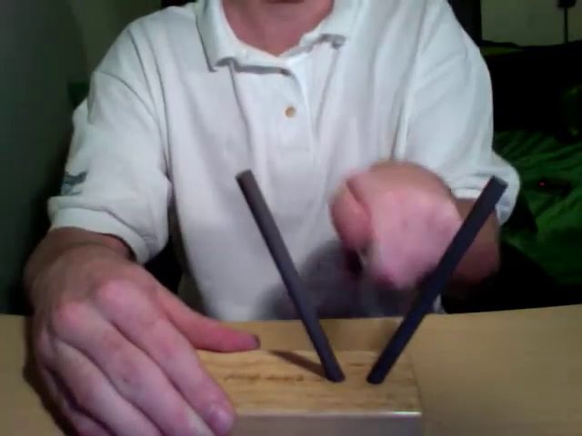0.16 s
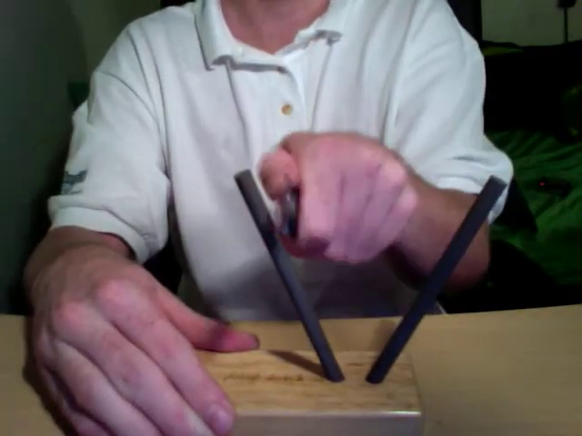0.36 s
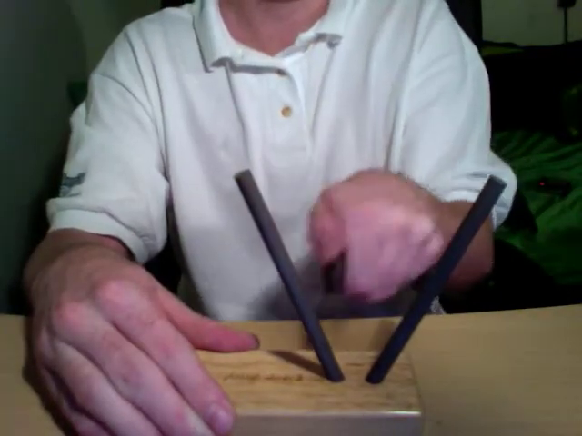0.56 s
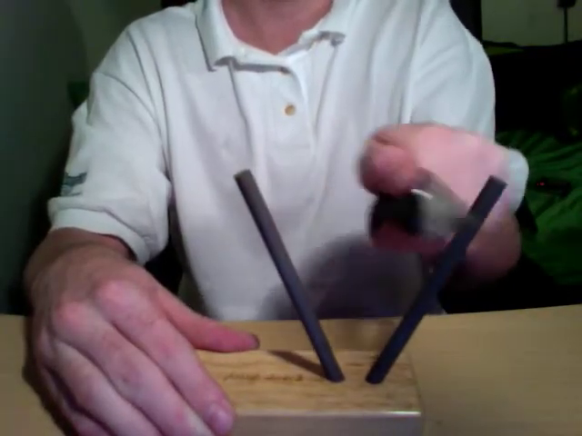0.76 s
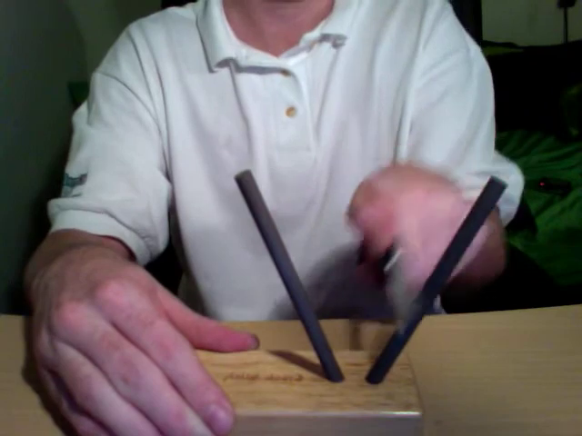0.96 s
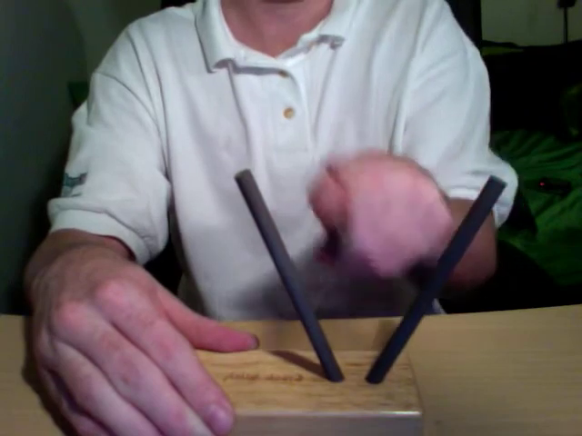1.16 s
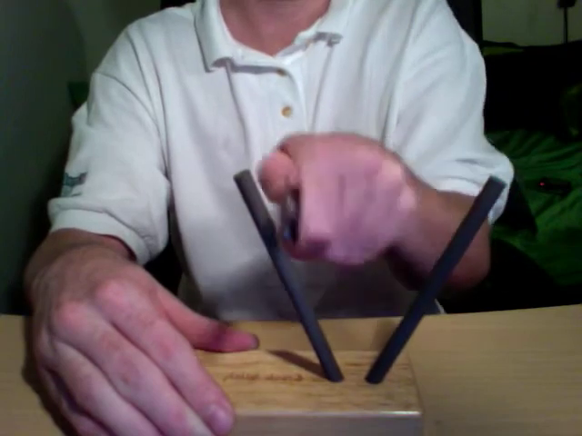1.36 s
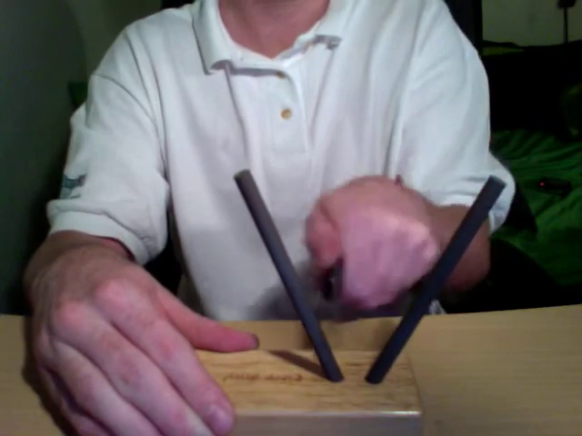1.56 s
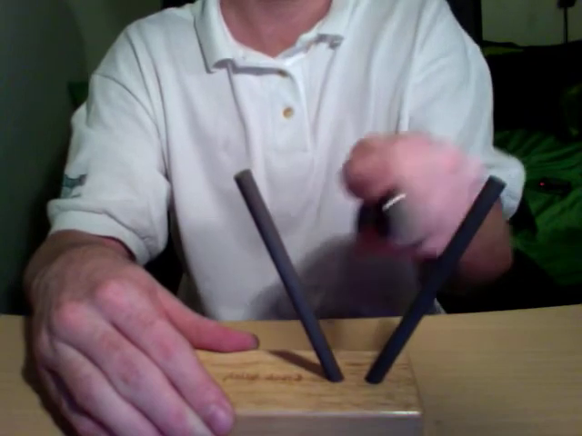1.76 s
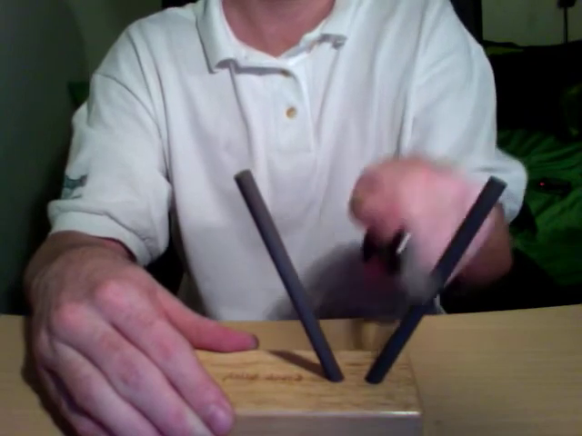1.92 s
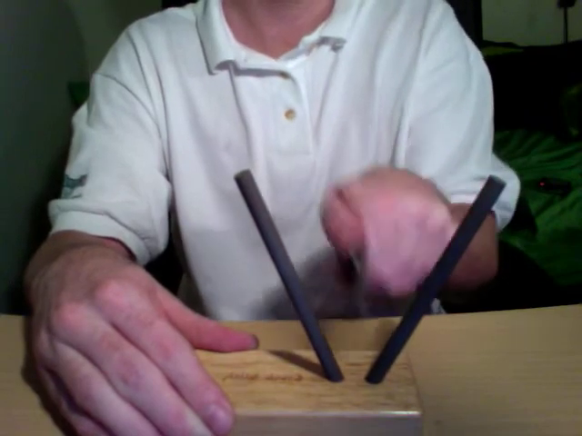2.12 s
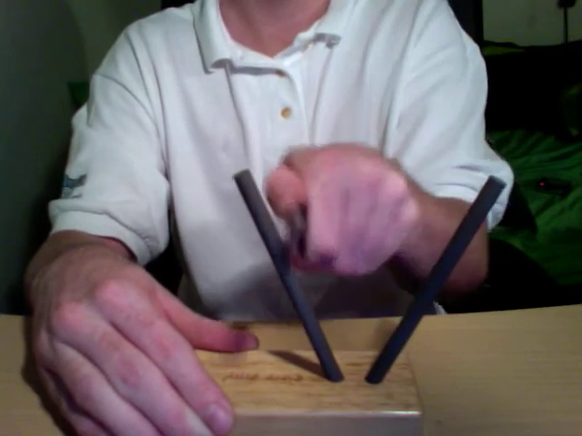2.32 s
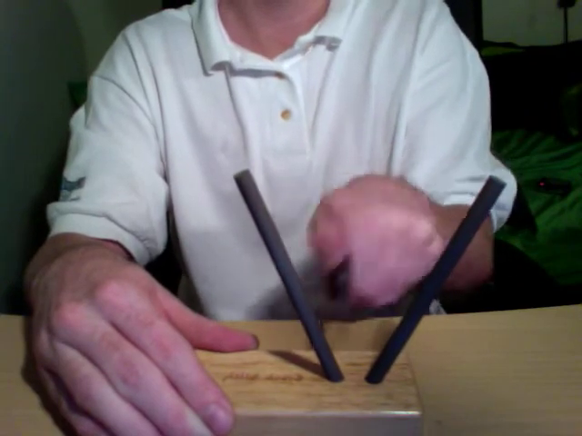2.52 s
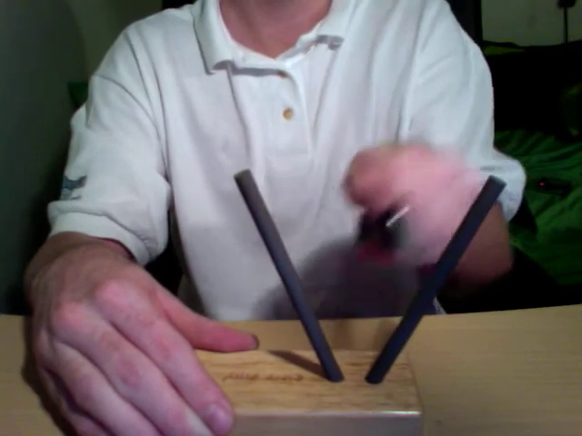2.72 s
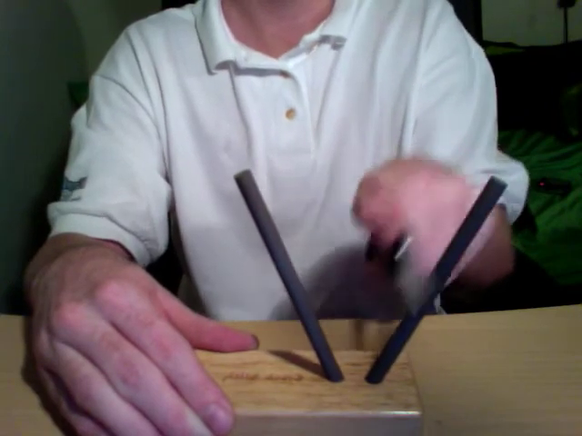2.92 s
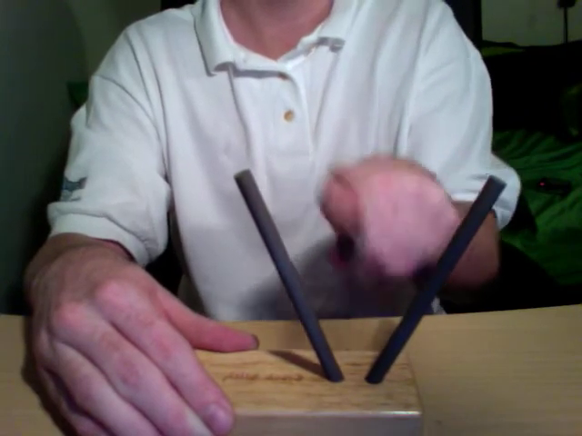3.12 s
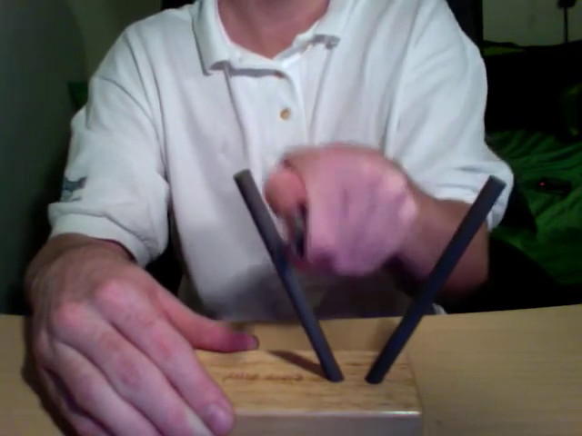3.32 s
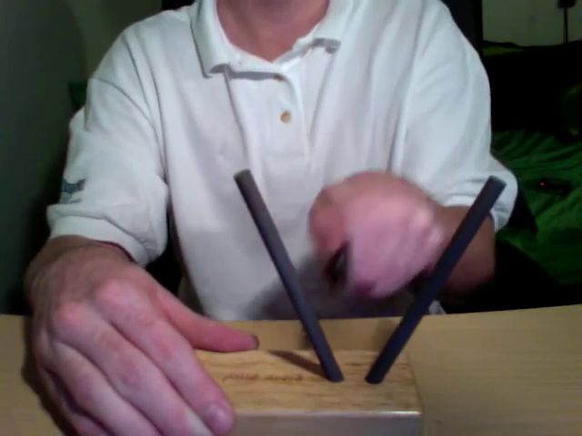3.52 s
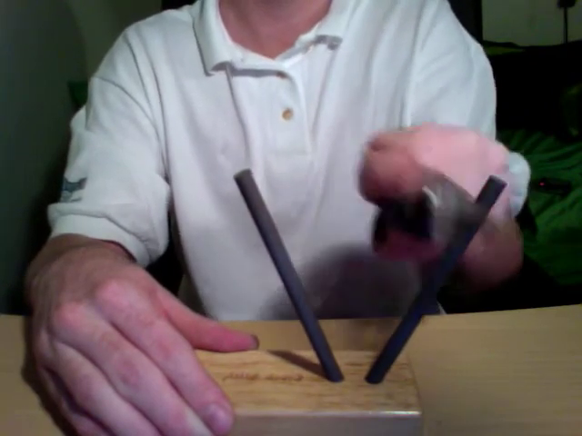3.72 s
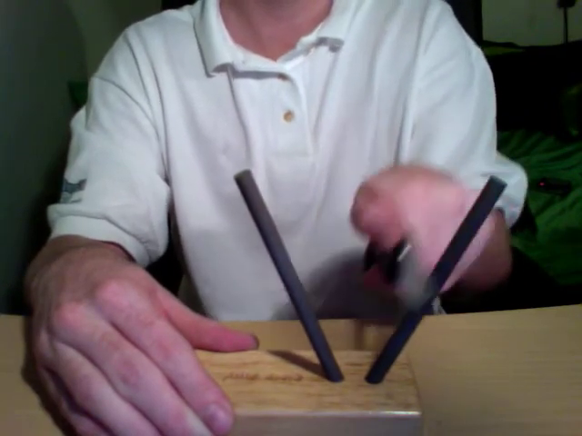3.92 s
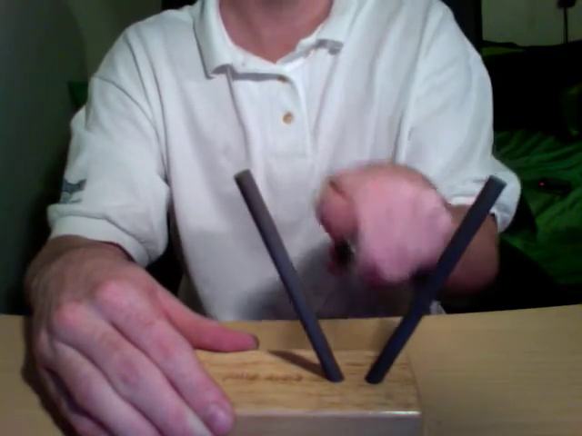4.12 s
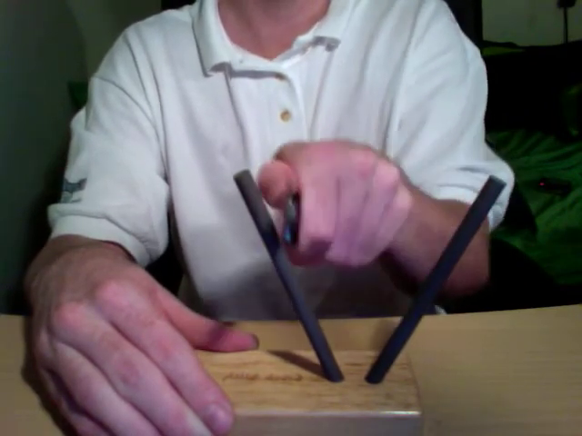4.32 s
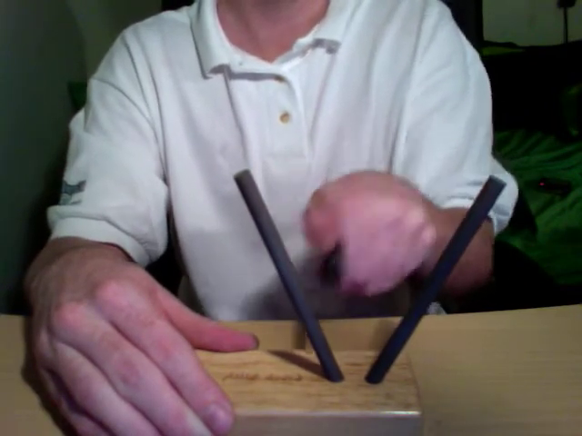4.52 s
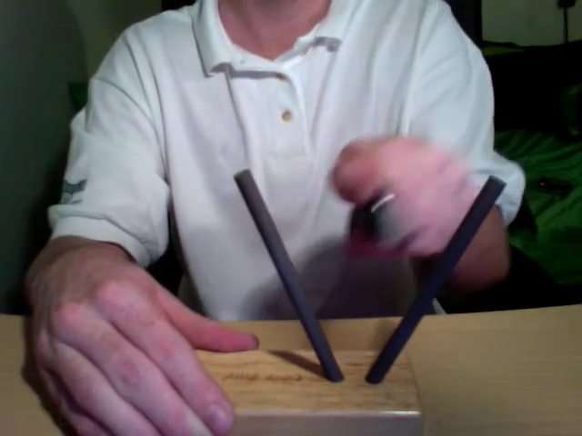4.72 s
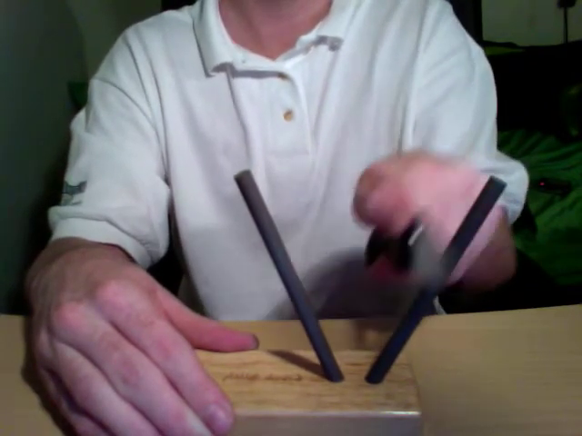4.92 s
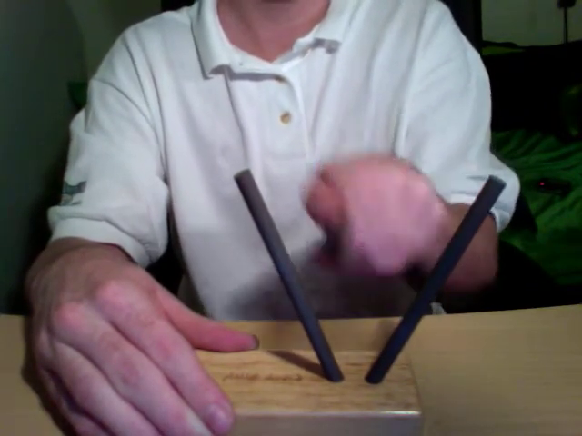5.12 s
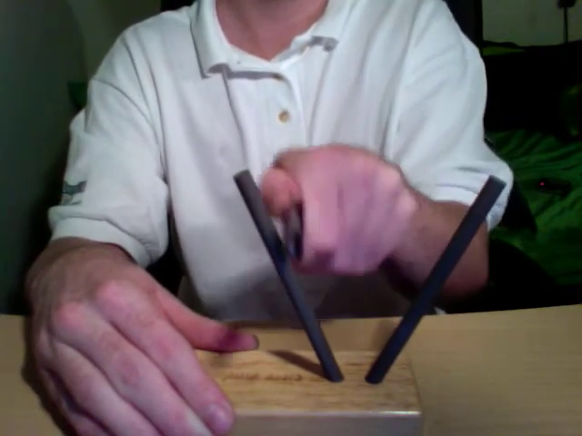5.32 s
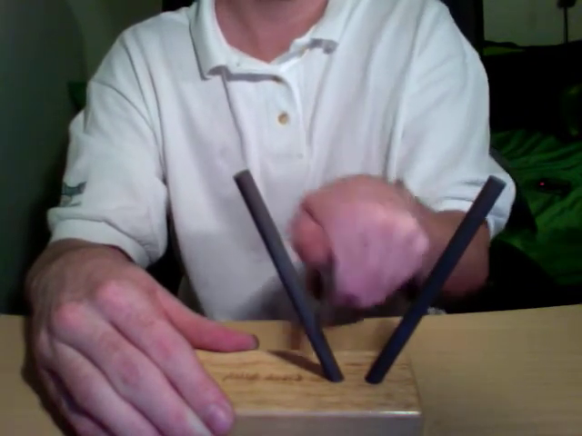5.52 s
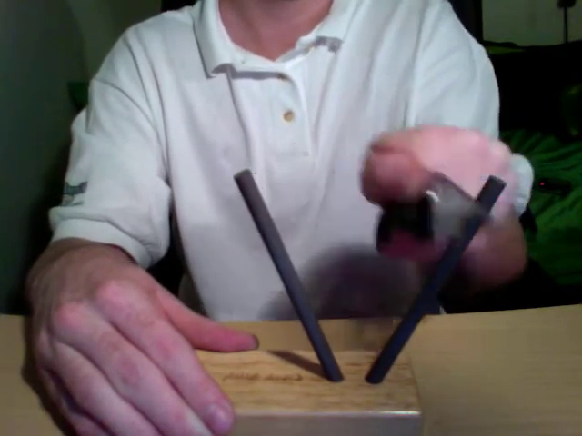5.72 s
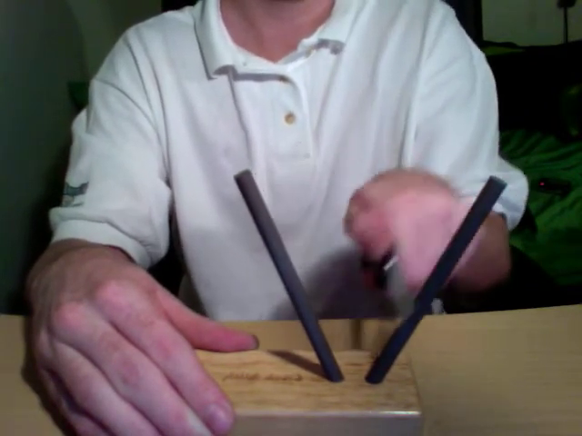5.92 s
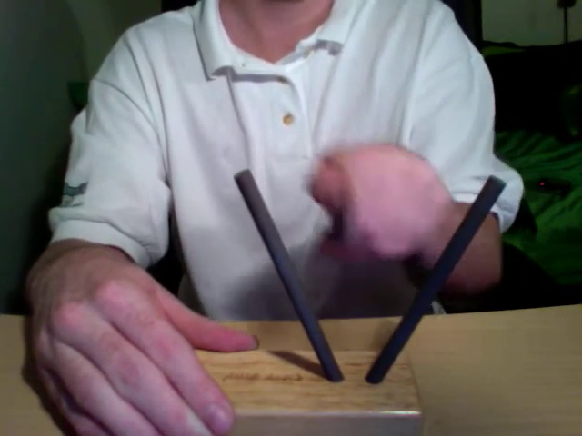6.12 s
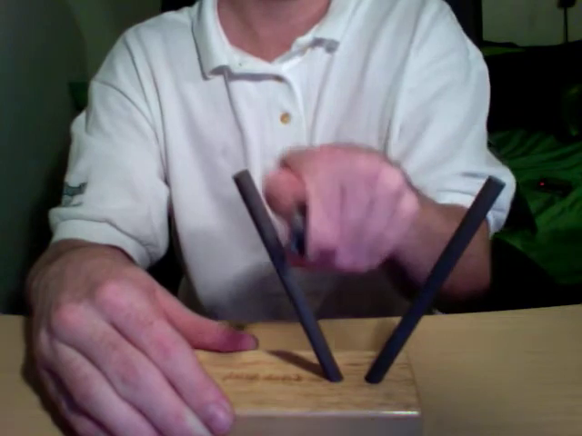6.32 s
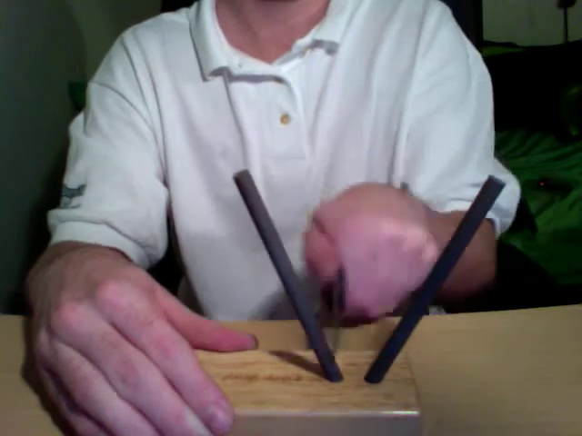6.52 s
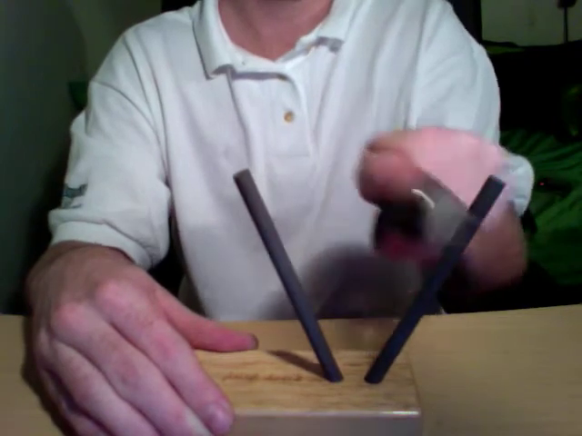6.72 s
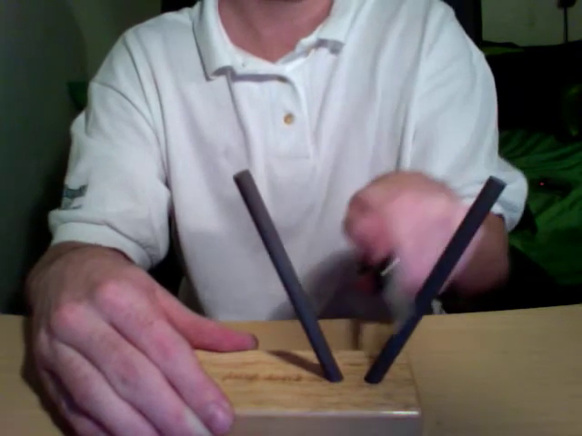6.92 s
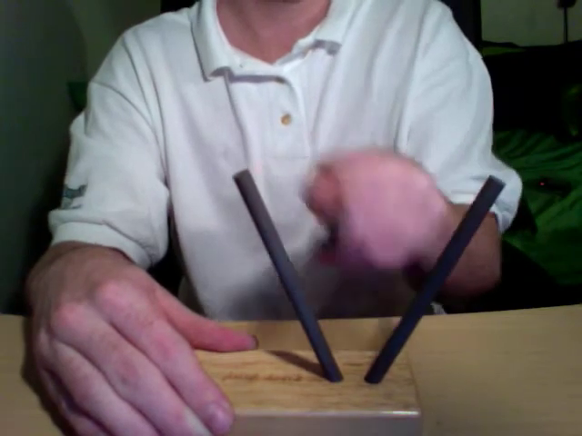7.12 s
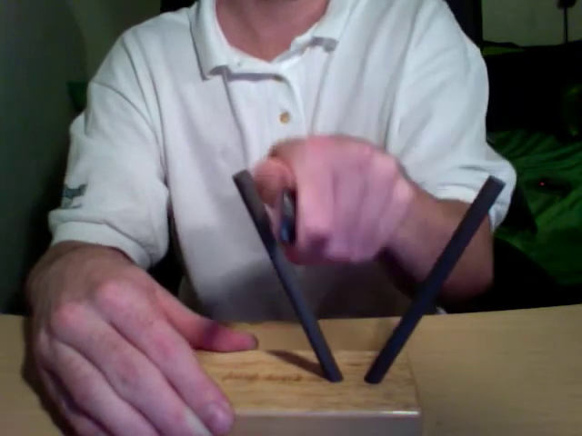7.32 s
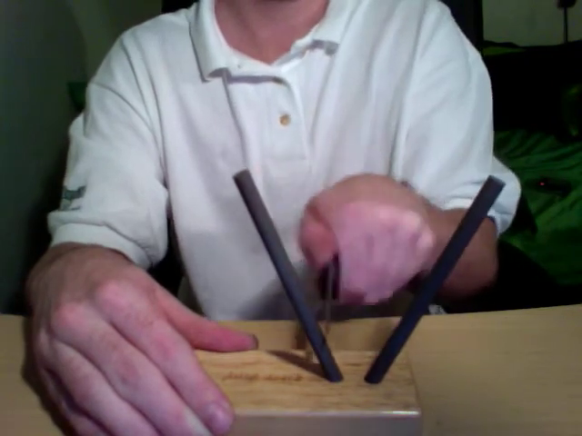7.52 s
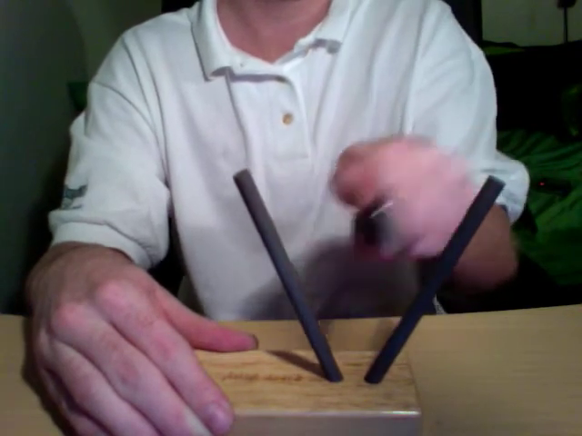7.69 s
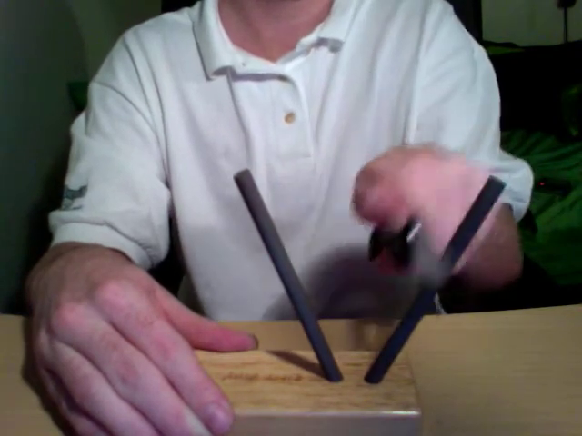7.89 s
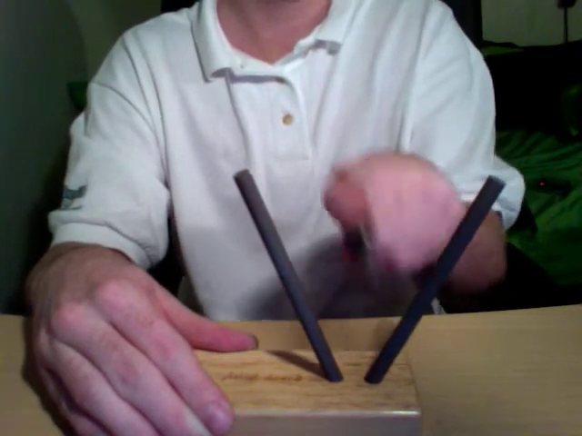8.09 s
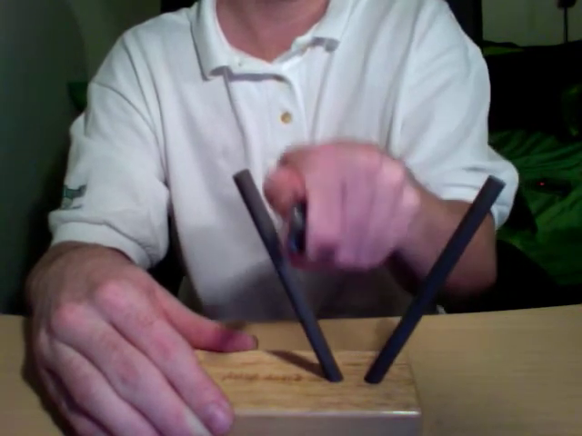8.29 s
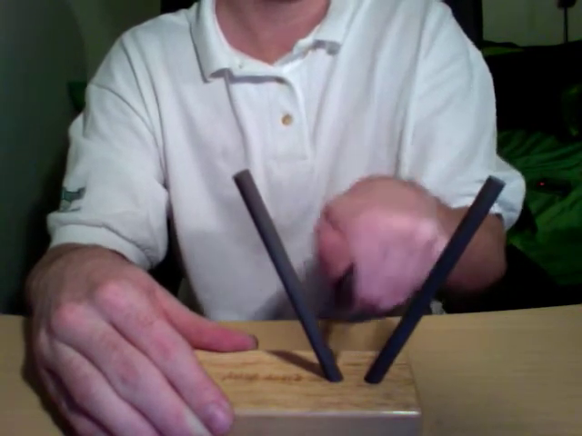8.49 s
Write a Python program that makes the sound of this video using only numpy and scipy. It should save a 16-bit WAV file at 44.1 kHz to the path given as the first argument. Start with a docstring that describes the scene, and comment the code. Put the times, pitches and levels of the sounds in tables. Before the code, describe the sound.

A steel knife is stroked down two ceramic sharpening rods set in a wooden base, alternating sides about every half second. Each stroke lands with a small tap, then a dry metallic rasp swells, climbs in pitch and cuts off quickly. One side is brighter and louder, the other softer and woodier. Heard close up in a small furnished room, with short echoes and a very quiet fan drone.

```python
"""Gritty strokes alternate left and right, each opening with a tap and rising in pitch as it rasps.
A steel knife is drawn down two ceramic rods that stand in a V on a wooden base.
Filtered noise makes the rasp, with a gliding resonance for the blade; decaying sines make the taps.
A small furnished room adds early echoes, a short diffuse tail and a quiet fan, heard from close by."""
import sys
import numpy as np
from scipy import signal
from scipy.fft import rfft, irfft, next_fast_len
from scipy.io import wavfile
from scipy.ndimage import uniform_filter1d

SR = 44100
rng = np.random.default_rng(int(sys.argv[2]) if len(sys.argv) > 2 else 0)


def unload_audio(sound):
    """Save the sound as a 16-bit wav file, at the path given as the first command line argument."""
    columns = np.transpose(np.atleast_2d(sound))
    # keep every value between -1 and 1, then stretch to whole-number steps
    steps = np.round(np.clip(columns, -1, 1) * 32767)
    wavfile.write(sys.argv[1], SR, steps.astype(np.int16))


N = 377055


def left_rod():
    """The left rod: the rasp of noise-driven resonances, plus the taps of struck modes."""
    # strokes: landing t/s, length/s, crest after landing/s, slack after landing/dB (negative: edge digs in),
    # base level/dB, blade level/dB, grit hiss level/dB, hiss rise/dB per s,
    # tap level/dB, tap's low thump/dB, tap's wooden knock/dB; levels are before the rod's trims
    strokes = [ (0.3484, 0.23, .16, 7.5, -39, -33.5, -54, -8, -32, 8.5, -9),
               (1.3184, 0.24, .16, 3, -39.5, -34.5, -54.5, -15, -32.5, 6, 3),
               (2.2963, .24, 0.17, 2.5, -38.5, -35, -55, -8, -33.5, 0, -8),
               (3.3007, 0.23, .15, 0, -38.5, -36.5, -54.5, 1.5, -34.5, -3, 7),
               (4.2892, 0.25, .15, 4.5, -37, -32.5, -53.5, 52, -36.5, 5, 8.5),
               (5.3133, 0.23, 0.17, -1, -39, -36, -57.5, -24, -33, -1, -2.5),
               (6.3036, 0.26, .19, 4, -39.5, -33.5, -55.5, -9.5, -29, 4, -1.5),
               (7.3152, 0.24, .155, 1, -39, -35, -53.5, -23.5, -33, 1.5, -2.5),
               (8.3443, 0.25, 0.13, 0, -37.5, -34.5, -55, 12, -30.5, -3, 14.5), ]
    # swell to a crest, rows for base, blade, hiss: swell/dB, half width of the crest/s, fade/dB per s
    swell = [(16.5, .15, 10.5), (14, .088, -14.5), (2, 0.063, 14.5)]
    # resonances of the wooden base, each best excited at one place on the rod:
    # f/Hz, half width/Hz, relative level/dB, strongest t/s after landing at the usual pace, spread/s
    base_peaks = [(381, 82, -3.5, 0.025, 0.12), (639, 140, -5.5, .16, 0.36), (782, 64, 1.5, 0.11, 0.23),
                  (926, 120, 0.5, 0.13, 0.1), (1134, 250, -3, 0.17, 0.15)]
    # resonances of blade and rod: f/Hz, half width/Hz, relative level/dB, strongest t/s, spread/s
    steel_peaks = [(1790, 100, 0.5, 0.19, 0.089), (2150, 200, -4.5, 0.18, 0.17),
                   (2585, 300, -5.5, 0.17, 0.45), (3242, 260, -4.5, .18, 0.14), (3740, 380, -6, 0.13, .1),
                   (4530, 770, -16.5, 0.013, 0.038)]
    # resonances of the thin edge: f/Hz, half width/Hz, relative level/dB, strongest t/s, spread/s
    edge_peaks = [(4970, 370, -10, 0.029, 0.089), (5640, 350, 1.5, 0.33, 0.091),
                  (6290, 280, -3.5, 0.23, 0.061), (6950, 160, -6.5, 0.13, .15),
                  (7610, 240, -5, 0.16, 0.059), (9130, 300, -10.5, .24, .14)]
    # colour of the grit hiss: f/Hz, relative level/dB
    hiss_colour = [(1500, -41.5), (3800, 3), (4500, 2), (5300, -0.5), (6300, -5.5), (7300, -3),
                   (8400, -7.5), (9400, -13), (10300, -10), (12800, -11), (15500, -19)]
    # blade's sliding resonance: t/s after landing at the usual pace, f/Hz, level against the blade/dB
    glide = [(.03, 1498, -23), (.13, 1683, -11), (.19, 1900, -7), (.26, 2302, -4.5)]
    # modes of base, rod and blade in a tap: f/Hz, relative level/dB, t60/s before the hand's damping
    tap_modes = [(128, -38.5, 0.065), (200, -19, 0.11), (273.4, -14, 0.039), (564, -19.5, 0.049),
                 (853, -6.5, 0.012), (1303, -12, 0.015), (1624, -3, 0.013), (1870, 2.5, 0.014),
                 (2660, -4.5, 0.024), (3840, 21.5, 0.0015), (4680, -8, 0.0087), (5280, 6, 0.0051),
                 (6070, -17.5, 0.017), (6660, -10, 0.013), (9200, -7.5, 0.0067), (13063, -1.5, 0.00064)]
    strokes_sound = rasp(
        strokes, swell, base_peaks, steel_peaks, edge_peaks, hiss_colour, glide,
        base_db=-1.0, steel_db=-1.2, edge_db=-6, hiss_db=-1.0, rumble_db=-6.5,
        rumble_fall_db_per_s=96, glide_knots_per_s=370, grain_db=0.0)
    taps_sound = taps(strokes, tap_modes, level_db=-0.47, attack_s=0.0019,
                      crack_db=-6.5, crack_t60_s=0.02, scatter_db=2.8)
    return scattered(strokes_sound + taps_sound)


def right_rod():
    """The right rod: the same mechanisms; its first stroke is already under way at 0 s."""
    # strokes: landing t/s, length/s, crest after landing/s, slack after landing/dB (negative: edge digs in),
    # base level/dB, blade level/dB, grit hiss level/dB, hiss rise/dB per s,
    # tap level/dB, tap's low thump/dB, tap's wooden knock/dB; levels are before the rod's trims
    strokes = [ (-0.14, .23, 0.17, 2, -40, -29.5, -47.5, 1, -24, 0, 0),
               (0.8552, 0.23, .165, 1, -40, -29, -47.5, -3.5, -25, 1, -0.28),
               (1.8166, 0.23, 0.17, 2, -38, -28.5, -48.5, -7, -22, 1, 0.14),
               (2.7759, 0.25, 0.18, 9.5, -38.5, -30, -48, 11, -27.5, -1.1, -1),
               (3.8128, 0.22, 0.15, -.5, -40, -30, -43.5, -0.5, -24, 0, 2),
               (4.8263, 0.23, .16, -2, -39.5, -31, -48.5, -20, -21.5, 1, -0.23),
               (5.8215, 0.22, .163, -0.5, -39.5, -32.5, -49, 8, -25.5, 0, 0),
               (6.8316, .221, 0.17, 0, -40, -31, -47, 4.5, -22.5, -1.4, 0),
               (7.8184, .237, 0.18, 1.5, -39.5, -29.5, -49.5, -0.5, -21.5, 0.75, 0.3), ]
    # swell to a crest, rows for base, blade, hiss: swell/dB, half width of the crest/s, fade/dB per s
    swell = [(7.3, .075, -4.5), (11, 0.043, 9), (3.3, .086, 7.5)]
    # resonances of the wooden base, each best excited at one place on the rod:
    # f/Hz, half width/Hz, relative level/dB, strongest t/s after landing at the usual pace, spread/s
    base_peaks = [(346, 40, -8.5, 0.025, 0.049), (593, 88, -0.5, 0.14, 0.18), (778, 78, 1.5, 0.15, 0.12),
                  (935, 140, -2.5, .17, 0.14), (1100, 130, 3, 0.25, 0.09)]
    # resonances of blade and rod: f/Hz, half width/Hz, relative level/dB, strongest t/s, spread/s
    steel_peaks = [(1550, 290, -3, 0.14, 0.08), (1760, 64, -1, 0.15, 0.07), (2117, 120, 0.5, 0.16, .08),
                   (2590, 120, 3, 0.15, 0.066), (3130, 370, -2.5, .21, 0.11),
                   (4000, 520, -2.5, 0.14, 0.055), (4354, 250, -6, 0.069, 0.099)]
    # resonances of the thin edge: f/Hz, half width/Hz, relative level/dB, strongest t/s, spread/s
    edge_peaks = [(4650, 520, -1.5, 0.043, 0.07), (5100, 130, 0.5, 0.17, .12), (5800, 150, -1, .18, .11),
                  (7830, 250, -5, .09, 0.054), (8500, 340, -8.5, 0.077, 0.071), (9050, 420, -3, 0.27, .08)]
    # colour of the grit hiss: f/Hz, relative level/dB
    hiss_colour = [(1500, -42), (3800, 1), (4500, -3), (5200, 1), (5900, 0), (6500, -6.5), (7400, -5.5),
                   (8100, -8.5), (9100, -9.5), (10000, -14.5), (13500, -15.5), (15500, -29.5)]
    # blade's sliding resonance: t/s after landing at the usual pace, f/Hz, level against the blade/dB
    glide = [(.03, 1352, -19.5), (.11, 1557, -8), (.16, 1817, -6.5), (.2, 2475, -3.5), (.25, 2751, -14.5)]
    # modes of base, rod and blade in a tap: f/Hz, relative level/dB, t60/s before the hand's damping
    tap_modes = [(138.5, -26, 0.11), (182, -19, 0.133), (268, -16, 0.089), (470, -16.5, 0.026),
                 (556, -16.5, 0.027), (803, -13.5, 0.041), (1060, -22.5, 0.04), (1325, -16.5, 0.027),
                 (1559, -8.5, 0.032), (1783, -4, 0.014), (2770, 2.5, 0.007), (3720, -4.5, 0.014),
                 (4125, -1.5, 0.014), (4751, 3.5, 0.005), (6190, -9, 0.0082), (6830, -16, 0.0068),
                 (8879, 4.5, 0.0012), (13653, -2, 0.001)]
    strokes_sound = rasp(
        strokes, swell, base_peaks, steel_peaks, edge_peaks, hiss_colour, glide,
        base_db=-1.5, steel_db=-2.28, edge_db=-4.0, hiss_db=-3.0, rumble_db=0.0,
        rumble_fall_db_per_s=90.5, glide_knots_per_s=480, grain_db=0.6)
    taps_sound = taps(strokes, tap_modes, level_db=-.5, attack_s=0.00073,
                      crack_db=-12.5, crack_t60_s=.018, scatter_db=1.8)
    return scattered(strokes_sound + taps_sound)


def rasp(strokes, swell, base_peaks, steel_peaks, edge_peaks, hiss_colour, glide, base_db, steel_db,
         edge_db, hiss_db, rumble_db, rumble_fall_db_per_s, glide_knots_per_s, grain_db):
    """The edge grinds down one rod and excites wood, steel and grit, all roughened by its uneven bite."""
    # colour of the table's rumble under the base: f/Hz, relative level/dB
    rumble_colour = [(30, -48), (75, -36.5), (105, -17.5), (145, -7.5), (185, 2), (280, 6.5), (420, -13),
                     (800, -38)]
    age, base, blade, hiss = stroke_controls(strokes, swell)

    ring = sliding_ring(age, glide, glide_knots_per_s)
    steel = amp(steel_db) * rubbed(steel_peaks, age, wander_db=1.86) + ring

    # high on the rod the knife has most leverage on the base and the table
    rumble = amp(rumble_db - rumble_fall_db_per_s * age) * noise(rumble_colour)
    wood = amp(base_db) * rubbed(base_peaks, age, wander_db=2.67) + rumble

    edge = amp(edge_db) * rubbed(edge_peaks, age, wander_db=5.0)
    grit = edge + amp(hiss_db) * patchy(noise(hiss_colour), depth_db=2.0)

    # the edge catches and slides unevenly
    bite = amp(grain_db * wobble(260) + 1.2 * wobble(45))
    return bite * (base * wood + blade * steel + hiss * grit)


def sliding_ring(age, glide, knots_per_s):
    """The contact slides toward the tip, so one noisy resonance of the blade climbs through the stroke."""
    when, glide_hz, glide_db = np.transpose(glide)
    phase = 2 * np.pi * np.cumsum(np.interp(age, when, glide_hz)) / SR
    # two slow random curves on a carrier make a narrow band of noise around the gliding pitch
    band = unit(wobble(knots_per_s) * np.cos(phase) + wobble(knots_per_s) * np.sin(phase))
    chatter = unit(amp(1.5 * wobble(90)))
    return amp(np.interp(age, when, glide_db)) * chatter * band


def stroke_controls(strokes, swell):
    """Time since landing at the usual pace, and base, blade and hiss gains; silent with the knife in the air."""
    contact_s = .4  # longest span computed for a stroke
    seating_s, release_s = .01, 0.079  # the edge settles on the rod; it lifts off, falling by 60 dB
    lift_curve = 1.5  # the lift-off starts gently and then speeds up
    slack_at_s, slack_width_s = 0.036, .021  # the hand recoils from the landing and presses less
    usual_crest_s = .168  # crest at the usual pace, for which the resonance and glide times hold

    t = np.arange(1, int(contact_s * SR)) / SR
    swell_db, crest_width, fade_db_per_s = np.transpose(swell)[:, :, None]
    recoil = np.exp(-((t - slack_at_s) / slack_width_s) ** 2)
    seating = np.minimum(t / seating_s, 1)
    age, gains = np.zeros(N), np.zeros((3, N))
    for landing, length, crest, slack_db, base_db, blade_db, hiss_db, hiss_rise_db_per_s, *_ in strokes:
        past_crest = t - crest
        arch = 1 / (1 + (past_crest / crest_width) ** 2) - 1
        arch_db = swell_db * arch - fade_db_per_s * past_crest
        lift_db = -60 * (np.maximum(t - length, 0) / release_s) ** lift_curve
        levels = amp([[base_db], [blade_db], [hiss_db]])
        gain = seating * levels * amp(arch_db - slack_db * recoil + lift_db)
        gain[-1] *= amp(hiss_rise_db_per_s * past_crest)  # the wrist rolls the edge onto or off the grit

        at = round(landing * SR) + np.arange(len(t))
        heard = (at >= 0) & (at < N)
        age[at[heard]] = t[heard] * usual_crest_s / crest
        gains[:, at[heard]] = gain[:, heard]
    return age, *gains


def rubbed(peaks, age, wander_db):
    """Countless ceramic grains excite resonances; the moving contact hands energy from one to the next."""
    touching = age > 0
    since = age[touching]
    size = N // 2  # each rod is touched less than half of the time
    total, power = 0, 0
    for centre, width, db, best, spread in peaks:
        # the hand never holds the same angle twice, so each resonance comes and goes a little
        wander = wander_db * wobble(18, size=size)[:len(since)]
        share = amp(db + wander) / (1 + ((since - best) / spread) ** 2)
        band = coloured(lambda hz: 1 / (1 + ((hz - centre) / width) ** 2), size=size)
        total = total + share * band[:len(since)]
        power = power + share ** 2
    out = np.zeros(N)
    out[touching] = total / np.sqrt(power)  # steady power while the balance shifts
    return out


def taps(strokes, modes, level_db, attack_s, crack_db, crack_t60_s, scatter_db):
    """Each landing rings base, rod and blade as decaying sines; the hand damps them quickly."""
    thump_below_hz, knock_hz, knock_width_hz = 440, 754, 240  # rocking of the base; knock in its wood
    t = np.arange(SR // 4) / SR
    hz, mode_db, t60 = np.transpose(modes)[:, :, None]
    sign = (-1) ** np.arange(len(modes))[:, None]
    grit_band = signal.butter(1, [1500, 6000], "bandpass", fs=SR, output="sos")
    out = np.zeros(N + SR)
    for landing, *_, db, thump_db, knock_db in strokes:
        if landing < 0:
            continue
        strength, detune = rng.standard_normal((2, len(modes), 1))
        thump = thump_db / (1 + (hz / thump_below_hz) ** 2)
        knock = knock_db / (1 + ((hz - knock_hz) / knock_width_hz) ** 2)
        swing = sign * amp(mode_db + thump + knock + scatter_db * strength - 60 * t / t60)
        ring = np.sum(swing * np.sin(2 * np.pi * hz * (1 + 0.0045 * detune) * t), axis=0)

        # the edge crushes a few grains as it lands
        crunch = signal.sosfilt(grit_band, rng.standard_normal(len(t)))
        crack = amp(crack_db - 60 * t / crack_t60_s) * crunch
        hit = (ring + crack) * (1 - np.exp(-t / attack_s))
        hit = hit / (1 + (t / 0.055) ** 2)  # the pressing hand soon stills the base
        loudness = np.std(hit[:SR // 50])  # level over the first 20 ms
        out[round(landing * SR):][:len(t)] += amp(db + level_db) * hit / loudness
    return out[:N]


def scattered(x, scatter_db=-11, count=8):
    """Hand, chest and table top throw back weak copies of the treble within a few milliseconds."""
    treble = signal.sosfilt(signal.butter(2, 3500, "highpass", fs=SR, output="sos"), x)
    delays = (rng.uniform(.0006, 0.0072, count) * SR).astype(int)
    copies = sum(rng.choice([-1, 1]) * np.pad(treble, (delay, 0))[:N] for delay in delays)
    return x + amp(scatter_db) * copies / np.sqrt(count)


def reflections(x, near_hz=1700, wall_db=-20):
    """A near surface combs the low notes with an inverted echo, and a wall answers once."""
    near_gain, near_delay_s, wall_delay_s = .5, .00388, .019

    def echoes(hz):
        near = near_gain / (1 + (hz / near_hz) ** 2) * np.exp(-2j * np.pi * hz * near_delay_s)
        return 1 - near + amp(wall_db) * np.exp(-2j * np.pi * hz * wall_delay_s)
    return filtered(x, echoes)


def room(x, tail_db=-16, build_up_s=0.0031):
    """A short diffuse tail of decaying noise, drawn afresh each half second so no pitch rings on."""
    # decay of the room: f/Hz, t60/s
    decay_times = [(150, 0.38), (700, 0.27), (2800, 0.28), (5500, 0.25), (12000, 0.16)]
    out, block = np.zeros(N + SR), SR // 2
    for start in range(0, N, block):
        hz, t, z = signal.stft(rng.standard_normal(block), SR, nperseg=256)
        decay = amp(-60 * t / along(decay_times, hz)[:, None])
        build_up = 1 - np.exp(-t / build_up_s)
        tail = signal.istft(z * decay * build_up, SR, nperseg=256)[1]
        wet = signal.fftconvolve(x[start:start + block], tail[:block] / np.linalg.norm(tail))
        out[start:start + len(wet)] += wet
    return amp(tail_db) * out[:N]


def fan(level_db=-71.0, waver_db=1.0):
    """Room air and fan: a soft, slightly unsteady drone of coloured noise."""
    # colour of the air and fan: f/Hz, relative level/dB
    air_colour = [(25, -46.5), (70, -29.5), (120, -15.5), (190, -14), (228, 1.5), (255, -4), (300, -17),
                  (500, -16.5), (680, -15), (1050, -24), (2200, -29), (4800, -37.5), (9000, -43.5),
                  (16000, -61)]
    return amp(level_db + waver_db * wobble(14)) * noise(air_colour)


def patchy(x, depth_db):
    """Brief bright and dull patches, about 1 kHz by 15 ms, at rms 1."""
    z = signal.stft(x, nperseg=256)[2]
    across_pitch = uniform_filter1d(rng.standard_normal(z.shape), size=6, axis=0)
    field = uniform_filter1d(across_pitch, size=5, axis=1)
    return unit(signal.istft(z * amp(depth_db * unit(field)), nperseg=256)[1][:N])


def noise(spectrum):
    """Noise of rms 1 with a colour given as (Hz, dB) points."""
    return coloured(lambda hz: amp(along(spectrum, hz)))


def coloured(gain, size=N):
    """Noise of rms 1 whose spectrum follows gain(Hz)."""
    padded = next_fast_len(size, real=True)
    hz = np.fft.rfftfreq(padded, 1 / SR)
    white = rng.standard_normal(2 * len(hz)).view(complex)
    return unit(irfft(white * gain(hz), padded)[:size])


def wobble(rate, size=N):
    """A smooth random curve, rate knots a second."""
    count = int(size * rate / SR) + 4
    fine = signal.resample(rng.standard_normal(count), count * 8)
    return np.interp(np.arange(size) * rate / SR * 8, np.arange(len(fine)), fine)


def filtered(x, response):
    """x times a complex response of frequency."""
    size = next_fast_len(len(x) + 8192)  # room for the echoes to ring out
    return irfft(rfft(x, size) * response(np.fft.rfftfreq(size, 1 / SR)), size)[:len(x)]


def along(points, hz):
    """(Hz, value) points read on a log axis."""
    f, v = np.transpose(points)
    return np.interp(np.log(hz + 1), np.log(f), v)


def unit(x):
    """x at rms 1."""
    return x / np.sqrt(np.mean(x ** 2) + 1e-20)


def amp(db):
    """Decibels to gain."""
    return 10 ** (np.asarray(db) / 20)


def scene():
    """Strokes on both rods, in the room with its fan."""
    knife = left_rod() + right_rod()
    return (reflections(knife) + room(knife) + fan())[None]


def record(dry):
    """The deep bass is thinned and the sound stops steeply just under 16 kHz."""
    thinned = signal.sosfilt(signal.butter(3, 84, "highpass", fs=SR, output="sos"), dry)
    return signal.sosfilt(signal.butter(16, 15900, fs=SR, output="sos"), thinned)


dry = scene()
out = record(dry)
unload_audio(out)
```